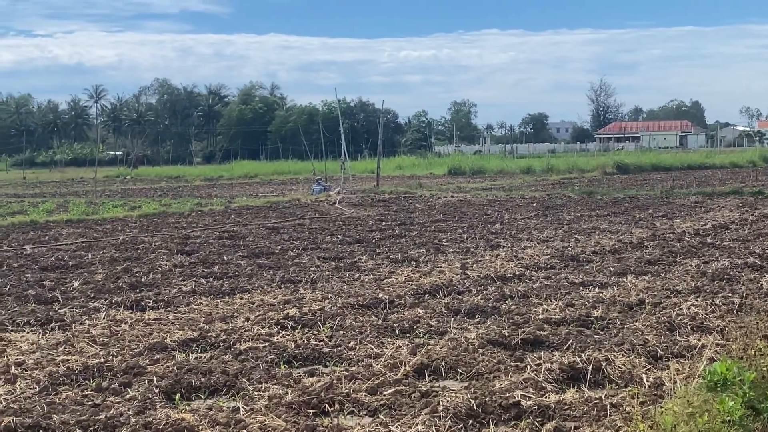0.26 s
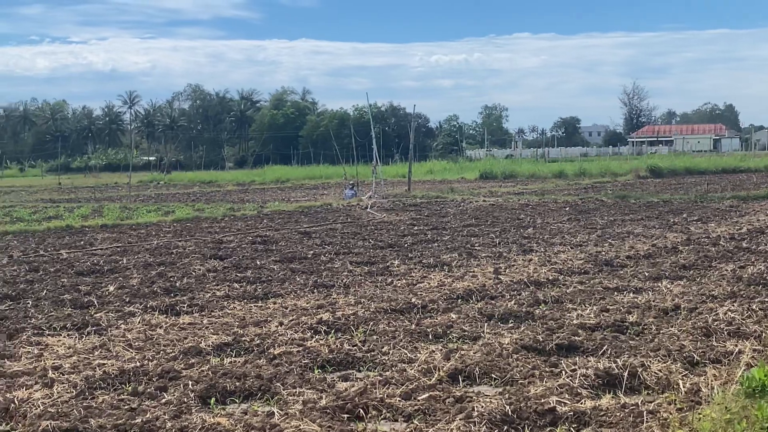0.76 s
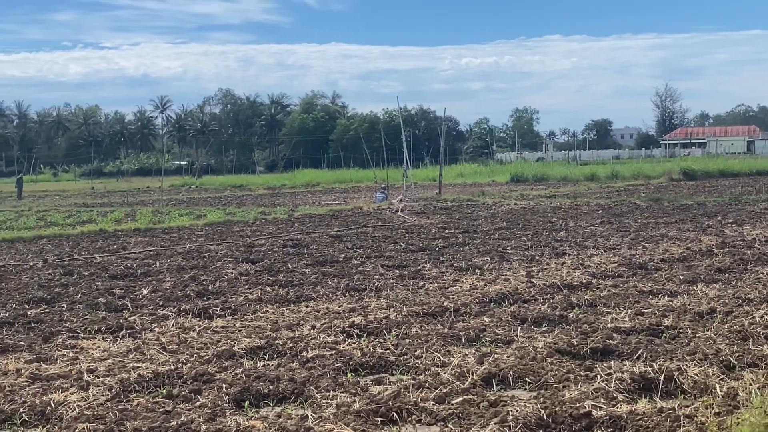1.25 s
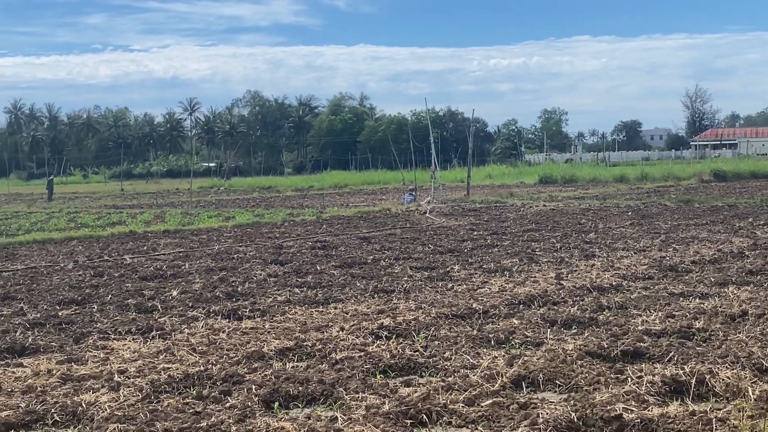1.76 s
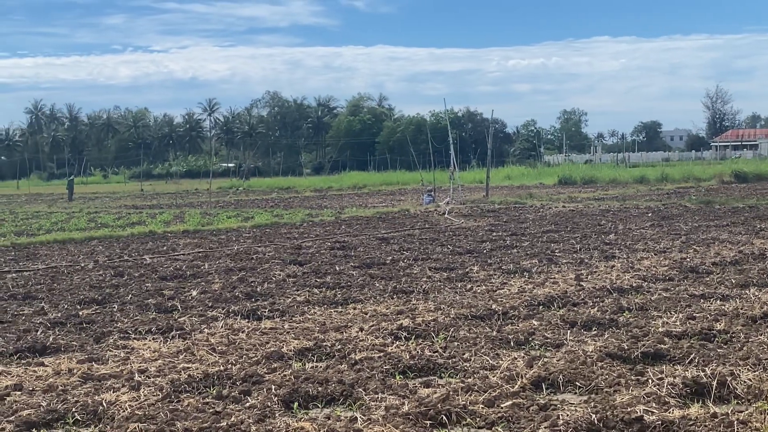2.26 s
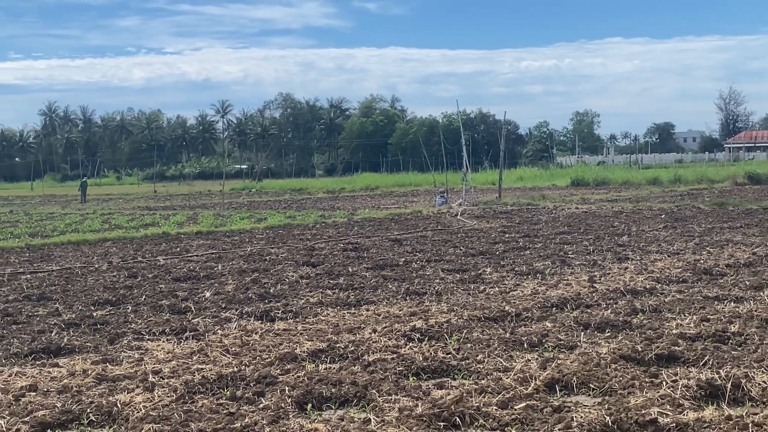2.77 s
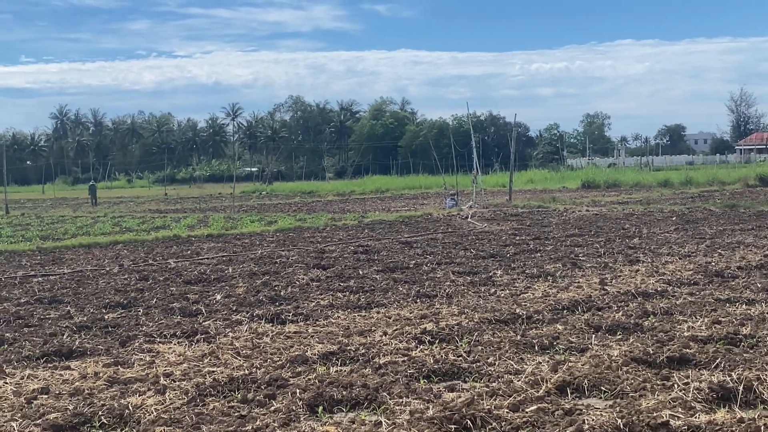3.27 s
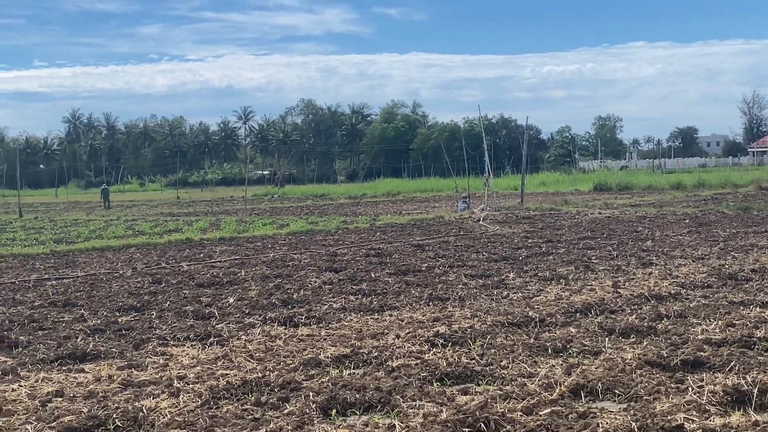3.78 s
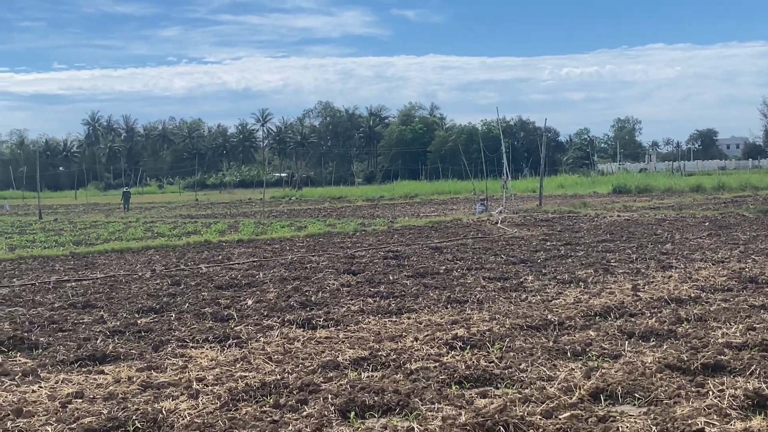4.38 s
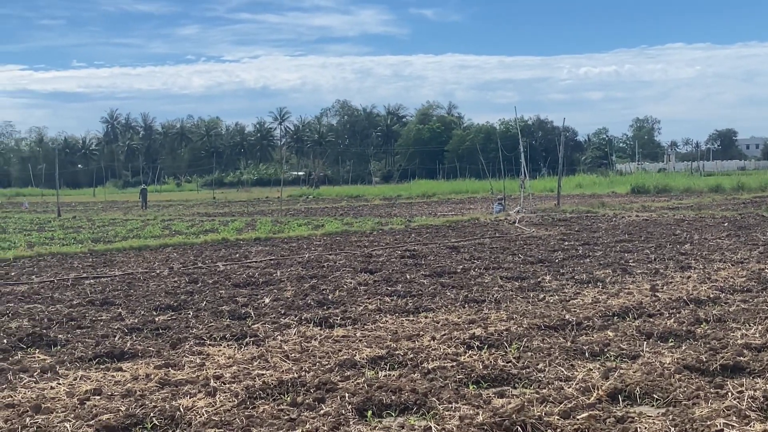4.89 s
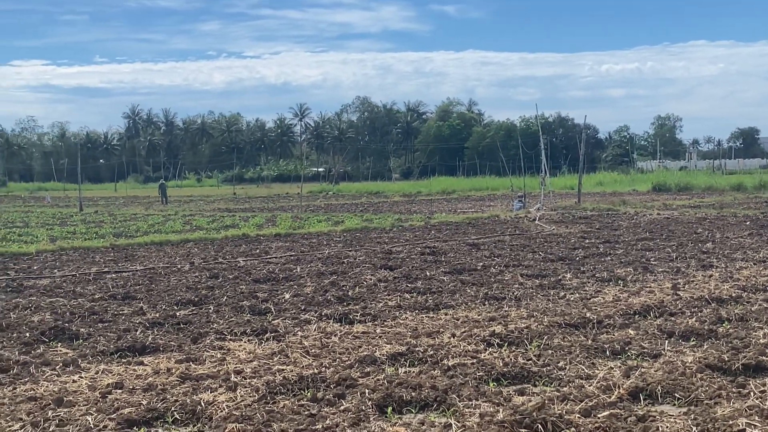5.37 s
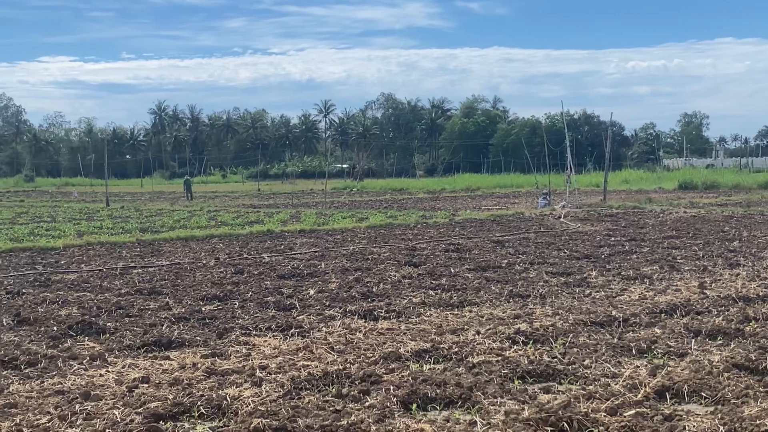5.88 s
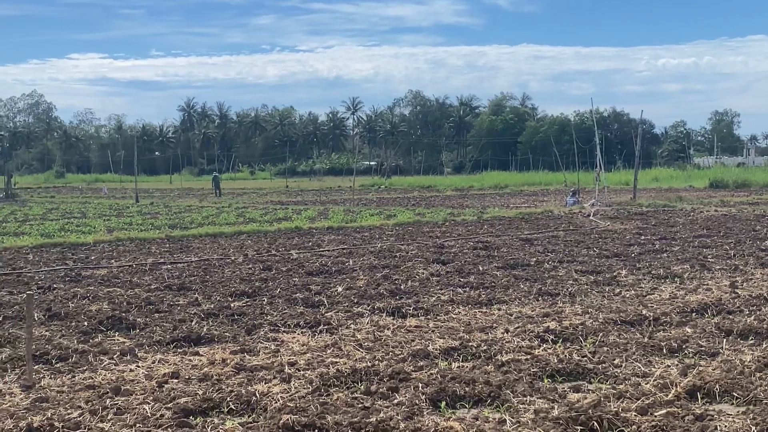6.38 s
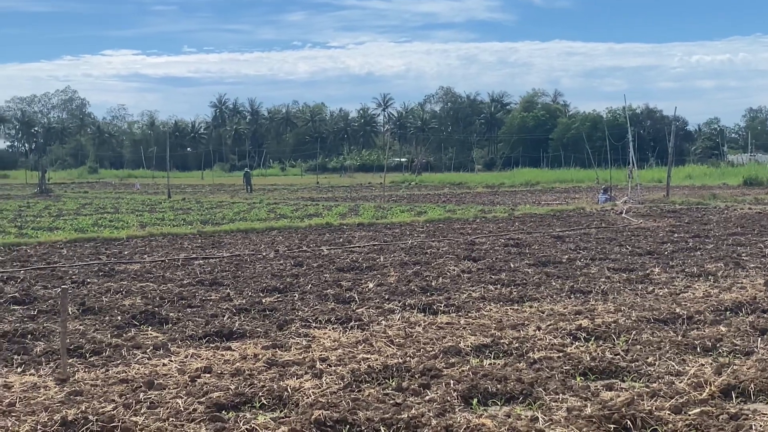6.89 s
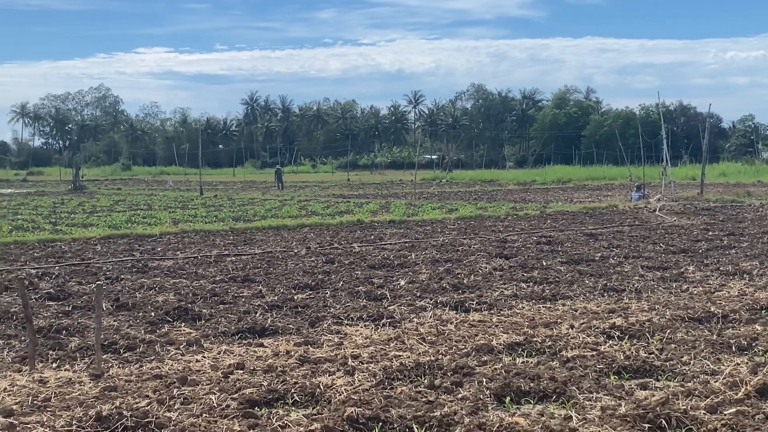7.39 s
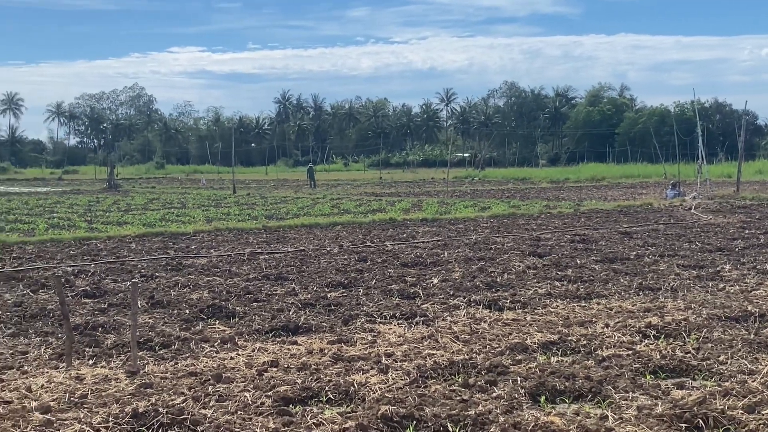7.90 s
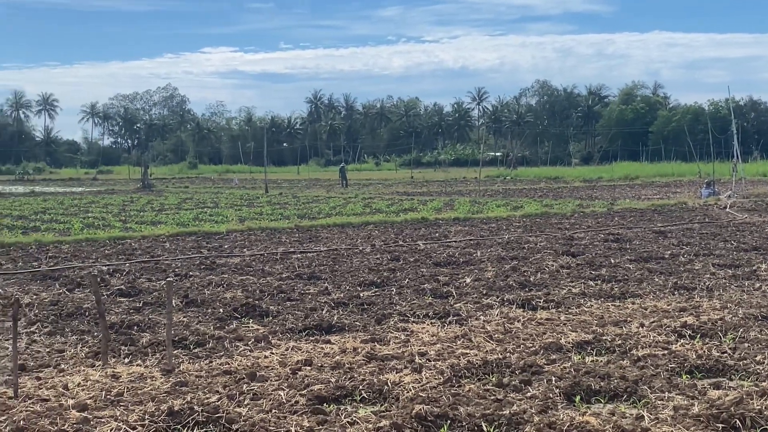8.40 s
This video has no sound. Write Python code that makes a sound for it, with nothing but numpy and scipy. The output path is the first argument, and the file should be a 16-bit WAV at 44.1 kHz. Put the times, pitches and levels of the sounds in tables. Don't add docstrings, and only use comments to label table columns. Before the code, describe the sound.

Low buffeting wind bursts over a soft distant hush, with tiny scattered bird calls, a faint far engine popping and a few finger taps.

```python
import sys
import numpy as np
from scipy import signal
from scipy.fft import rfft, irfft
from scipy.io import wavfile
from scipy.ndimage import uniform_filter1d

SR = 44100
rng = np.random.default_rng(int(sys.argv[2]) if len(sys.argv) > 2 else 0)


def ratio(d):
    e = np.asarray(d, float) / 20
    return 10 ** e


def int16_out(signal):
    q = np.round(np.clip(np.atleast_2d(signal).T, -1, 1) * 32767)
    wavfile.write(sys.argv[1], SR, q.astype(np.int16))


N = 381465


def evened(x):
    return x / np.sqrt(np.mean(x ** 2) + 1e-20)


def curve(points):
    return np.interp(np.arange(N) / SR, *np.transpose(points))


def add(mix, s, sound):
    part = mix[round(max(s, 0) * SR):][:len(sound)]
    part += sound[:len(part)]


def slow(length, hz):
    low_pass = signal.butter(2, hz, fs=SR, output="sos")
    settled = signal.sosfilt(low_pass, rng.standard_normal(length + 4000))[4000:]
    return evened(settled)


def noise(spectrum, size, patchy_db):
    frames, hz = 4 * N // size + 5, np.fft.rfftfreq(size, 1 / SR)
    real, imaginary, patches = rng.standard_normal((frames, len(hz), 3)).T
    patches = uniform_filter1d(patches, size=14, axis=0)
    patches = evened(uniform_filter1d(patches, size=12, axis=1))
    f, db = np.transpose(spectrum)
    colour_db = np.interp(np.log(hz + 1), np.log(f + 1), db)
    z = (real + 1j * imaginary) * ratio(colour_db[:, None] + patchy_db * patches)
    return evened(signal.istft(z, nperseg=size, noverlap=3 * size // 4)[1][:N])


# (time [s], rumble level [dB])
WIND_PUSH = [(0, -55.5), (1, -60), (1.85, -61.5), (2.5, -56.5), (3.25, -57), (3.45, -62), (4.2, -55.5),
             (6.5, -56.5), (6.87, -67.5), (7.11, -53), (7.6, -55), (8, -47), (8.65, -54)]
# (frequency [Hz], density [dB per Hz])
RUMBLE_SPECTRUM = [(15, -46), (30, -16), (50, -0.5), (78, -1), (110, -14.5), (170, -25), (300, -28.5),
                   (900, -91)]
# (frequency [Hz], density [dB per Hz])
FLAP_SPECTRUM = [(60, -11), (130, 8), (300, -15), (420, -21.5), (700, -102)]
# (time [s], peak level [dB], sharpness [dB])
LARGE_EDDIES = [(0.059, -36.5, 0.5), (0.078, -34.5, 0.5), (0.099, -33.5, -9.5), (0.669, -31.5, -6.5),
                (0.741, -36.5, -8.5), (0.77, -33.5, -17.5), (1.296, -36.5, -6), (2.642, -38, -10.5),
                (2.932, -33.5, -9), (3.062, -36, -9.5), (3.106, -28, -10), (3.13, -26, -13),
                (3.155, -19.5, -12), (3.256, -27.5, -15), (3.972, -33.5, -2.5), (5.157, -33.5, -10.5),
                (5.552, -36, -12), (5.601, -37, -8), (6.172, -40, -2), (6.372, -38.5, -9),
                (6.422, -41.5, -3.5), (7.665, -39, -9.5), (7.767, -31, -16), (7.809, -41, -17),
                (7.902, -33.5, -18), (7.953, -26.5, -16), (8.022, -31, -18), (8.088, -36.5, -17.5),
                (8.361, -23, -16.5), (8.433, -36, -24)]
# (time [s], peak level [dB])
SMALL_EDDIES = [(.19, -52), (0.377, -41.5), (0.501, -59), (.875, -55), (.945, -55), (1.01, -51),
                (1.221, -56), (1.91, -50), (2.439, -45.5), (2.585, -51), (2.735, -50.5), (2.917, -37.5),
                (3.035, -39), (3.184, -40), (3.292, -37), (8.39, -35), (0.805, -46), (1.368, -46),
                (1.573, -45), (2.227, -44.5), (2.268, -41), (2.318, -45), (2.962, -40), (3.219, -38.5),
                (3.333, -48), (3.362, -46), (4.153, -41.5), (4.421, -44), (4.474, -45), (4.634, -40.5),
                (4.692, -43), (5.449, -45), (5.853, -38.5), (5.911, -42), (6.067, -42), (6.271, -46.5),
                (7.214, -44.5), (7.311, -39.5), (7.472, -47), (7.702, -42.5), (7.871, -53), (8.211, -61),
                (8.272, -49.5), (8.309, -41), (8.622, -40.5)]
SMALL_SHARP_DB = -12.5
RING_HZ, RING_HZ_PER_DB = 87.2, 1.9


def wind():
    lumps = ratio(curve(WIND_PUSH) + 1.0 + 1.8 * slow(N, 7.0))
    mid = lumps * noise(RUMBLE_SPECTRUM, size=4096, patchy_db=1.5)
    side = lumps * noise(RUMBLE_SPECTRUM, size=4096, patchy_db=1.5)
    eddies = LARGE_EDDIES + [(s, db, SMALL_SHARP_DB) for s, db in SMALL_EDDIES]
    flaps, t = np.zeros(N), np.arange(6000) / SR
    lean = rng.standard_normal(len(eddies))
    rise = t / 0.0065
    for (s, db, sharp_db), pan in zip(eddies, lean):
        fall_hz = 420 * ratio(1.264 * sharp_db) * np.exp(-t / 0.00782)
        hz = RING_HZ + RING_HZ_PER_DB * sharp_db + fall_hz
        thump = ratio(db) * 1.66 * rise ** 2 * np.exp(2j * np.pi * np.cumsum(hz) / SR - rise)
        add(mid, s - .015, thump.imag)
        add(side, s - .015, 1.05 * pan * thump.real)
        flap = signal.windows.hann(round(0.047 * SR))
        add(flaps, s - .032, ratio(db + 1.25 * sharp_db - 3.5) * flap)
    mid += flaps * noise(FLAP_SPECTRUM, size=1024, patchy_db=2.0)
    side += 1.5 * flaps * noise(FLAP_SPECTRUM, size=1024, patchy_db=-1.5)
    return np.array([mid + ratio(-14.5) * side, mid - ratio(-17.0) * side])


def singer(notes, overtone_db, rough, edge):
    out = np.zeros(N, complex)
    for s, length, first, middle, last, db in notes:
        u = np.linspace(0, 1, round(length * SR))
        hz = first * 2 * (u - .5) * (u - 1) - middle * 4 * u * (u - 1) + last * 2 * u * (u - .5)
        turn = np.exp(2j * np.pi * np.cumsum(hz) / SR)
        tone = turn + ratio(overtone_db) * turn ** 2
        add(out, s, ratio(db) * tone * signal.windows.tukey(len(u), np.clip(edge, 0, 1)))
    scatter = slow(N, 150.0) + 1j * slow(N, 150.0)
    return (out * (np.sqrt(2 - 2 * rough ** 2) + rough * scatter)).real


def glides(rows, early):
    return [(s, length, first, first + early * (last - first), last, db)
            for s, length, first, last, db in rows]


def hook(s, hz, db):
    return s - .002, .029, .94 * hz, 1.01 * hz, 0.838 * hz, db


# (time [s], top frequency [Hz], level [dB])
PAIRED_HOOKS = [(1.042, 3012, -62.5), (1.201, 2940, -64), (1.35, 3154, -63), (1.551, 2720, -64.5),
                (1.795, 2840, -64), (2.018, 2850, -67), (2.276, 2910, -69), (2.54, 2730, -69),
                (2.816, 2750, -68), (3.097, 2910, -67), (3.375, 2850, -66), (3.655, 2790, -66),
                (3.942, 2810, -65), (4.222, 2860, -65), (4.44, 3055, -66.5), (4.709, 2770, -66.5),
                (4.984, 2890, -67), (5.225, 2890, -68.5), (5.572, 2850, -65), (5.921, 2850, -69)]
HOOK_GAP_S = .043


def hooks():
    paired = PAIRED_HOOKS + [(s + HOOK_GAP_S, hz, db) for s, hz, db in PAIRED_HOOKS]
    return singer([hook(*row) for row in paired], overtone_db=-17, rough=.25, edge=.3)


# (time [s], length [s], first frequency [Hz], last frequency [Hz], level [dB])
UPSTROKES = [(0.145, 0.036, 4250, 5550, -62.5), (6.862, .025, 6500, 7300, -84),
             (6.755, .025, 4950, 5550, -77), (.155, .06, 4750, 5200, -71), (0.195, 0.03, 5080, 5650, -65.5),
             (5.752, .025, 5100, 5700, -75), (7.29, .018, 5800, 6600, -75.5),
             (7.535, .02, 5700, 6500, -79.5), (2.875, .045, 5250, 5550, -83), (1.96, .04, 4100, 5100, -80),
             (2.39, .065, 3750, 4200, -70), (0.325, 0.03, 4200, 6510, -66.5),
             (.33, 0.028, 4700, 5660, -64.5), (.312, 0.021, 3600, 3910, -66),
             (1.532, 0.031, 4190, 5930, -73.5), (1.995, 0.025, 6500, 7300, -85.5),
             (2.445, 0.025, 4230, 5800, -79), (2.839, 0.05, 4280, 5230, -79.5),
             (3.376, 0.03, 3630, 5700, -60.5), (3.964, 0.026, 4260, 5900, -67),
             (4.169, 0.02, 3580, 5700, -65), (4.578, 0.048, 3200, 6900, -76),
             (7.118, 0.07, 4600, 7020, -69.5), (8.605, 0.041, 4600, 5830, -77)]
# (time [s], length [s], first frequency [Hz], last frequency [Hz], level [dB])
DOWNSTROKES = [(0.388, 0.04, 6240, 2044, -62), (.4, .032, 5720, 3400, -66.5),
               (2.345, .045, 4120, 3700, -70.5), (0.992, 0.024, 5900, 4280, -70.5),
               (3.07, 0.043, 3990, 3440, -69.5), (3.319, 0.069, 5290, 3790, -71.5),
               (3.473, 0.038, 6540, 3410, -64), (4.028, 0.019, 6270, 3740, -70),
               (4.135, 0.046, 5000, 3510, -66.5), (4.6, 0.064, 2895, 2330, -74),
               (4.645, 0.016, 6600, 4500, -77), (6.775, 0.021, 5320, 4870, -73.5)]
# (time [s], length [s], top frequency [Hz], level [dB])
CRESTED = [
    (0.345, 0.061, 3930, -69.5),
    (0.355, .04, 6840, -77),
    (3.121, 0.078, 3340, -70.5),
    (3.44, 0.027, 6530, -66.5),
    (3.996, 0.039, 6780, -81),
    (4.194, 0.068, 6530, -77.5),
    (6.77, 0.053, 6500, -78),
]


def sweeps():
    crests = [(s, length, .92 * hz, hz, .92 * hz, db) for s, length, hz, db in CRESTED]
    notes = glides(UPSTROKES, early=0.54) + glides(DOWNSTROKES, early=0.53) + crests
    return singer(notes, overtone_db=-34, rough=.68, edge=.25)


# (time [s], length [s], frequency [Hz], level [dB])
SHORT_CHIPS = [(0.965, 0.0099, 4300, -66.5), (1.003, 0.013, 4620, -74.5), (.452, .014, 3500, -68),
               (.672, .014, 5000, -73), (.51, .016, 6500, -78.5), (7.495, .022, 3600, -71),
               (8.14, 0.024, 3750, -75), (3.4, 0.053, 5480, -58.5), (3.499, 0.012, 2800, -65),
               (3.724, 0.018, 3600, -68), (4.1, 0.018, 3220, -63), (4.044, .012, 3780, -59.5),
               (6.67, .014, 4250, -76), (6.71, .02, 3600, -74), (6.891, 0.026, 3660, -68),
               (7.088, 0.018, 3750, -62), (7.288, 0.014, 3500, -66.5)]


def chips():
    notes = [(s, length, hz, hz, hz, db) for s, length, hz, db in SHORT_CHIPS]
    return singer(notes, overtone_db=-40, rough=.7, edge=.4)


# (time [s], level [dB])
CLIMB_TIMES = [
    (0.43, -73),
    (0.701, -78),
    (1.0, -75),
    (1.306, -81.5),
    (1.615, -80),
    (1.92, -85),
]
# (delay [s], length [s], first frequency [Hz], last frequency [Hz], level [dB])
STEPS = [
    (0, .066, 4640, 5160, 1.5),
    (0.065, .045, 5360, 6770, -1.5),
    (0.098, 0.023, 6700, 6800, -7),
]


def climbs():
    rows = [(s + late, length, first, last, db + step_db)
            for s, db in CLIMB_TIMES for late, length, first, last, step_db in STEPS]
    return singer(glides(rows, early=.6), overtone_db=-40, rough=.35, edge=.3)


# (time [s], length [s], first frequency [Hz], last frequency [Hz], level [dB])
THIN_WHISTLES = [(0.565, 0.12, 1390, 1520, -68.5), (.69, .1, 1600, 1810, -73), (.7, .15, 1420, 1448, -74),
                 (1.395, .055, 1440, 1410, -71.5), (1.033, 0.074, 777, 810, -69),
                 (1.228, 0.083, 980, 927, -67.5), (1.86, 0.12, 1430, 1640, -67.5),
                 (1.98, .095, 1700, 2050, -67), (2.04, 0.13, 1200, 1496, -70.5),
                 (2.2, 0.098, 1960, 1800, -69), (2.65, 0.08, 1780, 1755, -72),
                 (2.906, 0.086, 1017, 854, -67.5), (4.013, 0.022, 3070, 3470, -64),
                 (5.02, 0.12, 832, 713, -71), (5.157, 0.069, 1550, 1450, -69),
                 (5.27, 0.048, 2386, 2400, -71), (8.401, 0.11, 843, 757, -69.5)]


def whistles():
    return singer(glides(THIN_WHISTLES, early=.5), overtone_db=-30, rough=.6, edge=.2)


# (time [s], length [s], first frequency [Hz], last frequency [Hz], level [dB])
FALLING = [
    (5.87, .075, 3250, 2820, -70),
    (6.24, .135, 3350, 2600, -68),
    (7.755, .125, 2850, 2560, -72),
    (8.03, .115, 2800, 2520, -72),
    (8.34, .09, 2680, 2490, -72),
    (8.58, .068, 2900, 2500, -75),
]
# (time [s], length [s], top frequency [Hz], level [dB])
DROOPING = [
    (4.616, 0.048, 7200, -93),
    (7.405, 0.066, 6000, -76),
    (7.657, 0.051, 5860, -78.5),
    (8.154, 0.052, 5780, -75.5),
]
# (time [s], top frequency [Hz], level [dB])
SINGLE_HOOKS = [
    (1.377, 3570, -68),
    (1.573, 3300, -67.5),
    (1.821, 3310, -69.5),
    (2.455, 2800, -78),
]


def clear_notes():
    arches = [(s, length, 0.9 * hz, hz, .92 * hz, db) for s, length, hz, db in DROOPING]
    notes = glides(FALLING, early=.74) + arches + [hook(*row) for row in SINGLE_HOOKS]
    return singer(notes, overtone_db=-30, rough=.2, edge=.25)


# (time [s], length [s], first frequency [Hz], last frequency [Hz], level [dB])
THIN_THREADS = [(2.13, 0.059, 1760, 1634, -63.5), (2.15, 0.12, 2290, 2130, -73),
                (2.62, 0.097, 1970, 2020, -69), (3.46, .39, 2443, 2440, -75.5),
                (3.74, 0.1, 3270, 3180, -71.5), (4.03, .05, 2520, 2380, -69.5),
                (4.075, .065, 2380, 2330, -67.5), (4.22, 0.17, 2430, 2380, -75.5),
                (4.22, 0.078, 3820, 3770, -72.5), (4.31, 0.073, 3870, 3840, -72.5),
                (4.22, 0.07, 4590, 4500, -75.5), (4.7, 0.054, 3260, 3360, -76),
                (1.62, 0.077, 2000, 2070, -74.5), (4.41, 0.022, 2790, 2570, -66),
                (4.68, .04, 2360, 2310, -73), (4.86, 0.055, 4170, 4120, -76), (6.85, .04, 5050, 5000, -79),
                (6.82, .08, 5850, 5800, -83), (5.39, .06, 4650, 4720, -77), (7.2, .07, 5750, 5700, -82),
                (3.86, .17, 1450, 1430, -74), (5.18, .03, 3340, 3440, -72),
                (5.35, 0.046, 2860, 2740, -71.5), (5.38, 0.045, 2373, 2290, -70.5),
                (5.45, 0.097, 2440, 2290, -71), (6.87, .18, 1427, 1477, -74), (5.95, .04, 2630, 2530, -71),
                (7.92, 0.067, 5800, 5720, -82), (8.095, 0.074, 2790, 2850, -72.5),
                (8.385, 0.023, 2820, 2790, -77), (8.43, 0.11, 4020, 4130, -80)]


def threads():
    return singer(glides(THIN_THREADS, early=.5), overtone_db=-40, rough=.35, edge=.4)


def buzzer(buzzes, per_s, jitter, width_hz, sag_hz):
    out, t = np.zeros(N), np.arange(800) / SR
    for s, length, hz, db in buzzes:
        turns = np.cumsum(per_s * np.exp(jitter * slow(round(length * SR), 200.0))) / SR
        clicks = np.diff(np.floor(turns), prepend=0) * signal.windows.tukey(len(turns), .25)
        resonance = t * np.exp(2 * np.pi * (1j * hz - width_hz) * t)
        rings = signal.fftconvolve(clicks, resonance)
        sag = sag_hz * np.exp(-np.arange(len(rings)) / SR / (.3 * length))
        bend = np.exp(2j * np.pi * np.cumsum(sag) / SR)
        add(out, s, ratio(db) * evened((rings * bend).imag))
    return out


# (time [s], length [s], frequency [Hz], level [dB])
LOW_CALLS = [
    (6.53, .11, 2500, -73),
    (6.72, .11, 2540, -72),
    (6.91, .12, 2500, -69),
    (7.112, .105, 2530, -67),
    (7.295, .115, 2500, -68),
    (7.485, .14, 2500, -68.5),
    (7.68, .21, 1820, -71),
    (7.95, .07, 1980, -74),
    (8.04, .22, 1770, -70),
    (8.35, .13, 1820, -73),
]


def low_buzzes():
    return buzzer(LOW_CALLS, per_s=150, jitter=.2, width_hz=160, sag_hz=260)


# (time [s], length [s], frequency [Hz], level [dB])
HIGH_CALLS = [(2.3, 0.04, 4970, -80), (2.34, .08, 5500, -80), (2.55, .03, 5700, -87),
              (5.13, .07, 5570, -85), (8.33, .05, 4730, -79), (8.385, .06, 5430, -78.5),
              (8.47, .07, 4800, -80), (3.1, 0.074, 5650, -74), (3.37, 0.06, 7830, -83.5),
              (3.72, 0.11, 5370, -75), (4.12, .04, 5360, -75.5), (4.22, .06, 4500, -76),
              (4.72, .09, 5170, -81), (5.36, 0.043, 5060, -78), (5.56, .08, 5300, -81),
              (5.755, 0.1, 5520, -78), (6.045, 0.05, 6100, -81.5), (7.295, 0.03, 6570, -73),
              (7.545, 0.036, 6600, -78.5), (7.79, .05, 6470, -81), (8.04, 0.017, 6670, -78.5),
              (8.28, 0.037, 6200, -79), (8.53, 0.061, 6250, -84)]


def high_buzzes():
    return buzzer(HIGH_CALLS, per_s=630, jitter=0.9, width_hz=260, sag_hz=-300)


# (time [s], length [s], first frequency [Hz], last frequency [Hz], level [dB])
INSECT_TONES = [
    (0, .47, 2550, 2540, -71),
    (.5, .08, 2545, 2540, -73),
    (.62, .33, 2545, 2540, -76.5),
]


def insect():
    return singer(glides(INSECT_TONES, early=.5), overtone_db=-40, rough=.92, edge=.15)


# (time [s], level [dB])
FLOCK_LEVEL = [(0, 1.5), (1.5, 0.5), (2.2, -2), (3, -2), (4.3, 2), (5.5, 1), (6.8, -1), (7.8, -4),
               (8.65, -8)]


def flock(count):
    when, length, hz, bend, level = rng.random((count, 5)).T
    s = when * N / SR
    hz = 1900 * np.exp(1.15 * hz)
    fall_db = 9 * np.log2(hz / 1900)
    db = -69.5 - 6 * level - fall_db + np.interp(s, *np.transpose(FLOCK_LEVEL))
    first, last = hz * (1.1 - 0.18 * bend), hz * (0.83 + .15 * bend)
    notes = np.transpose([s, .012 + 0.05 * length, first, hz, last, db])
    return singer(notes, overtone_db=-40, rough=.45, edge=.6)


def far(x, wet_db, t60):
    t = np.arange(round(.3 * SR)) / SR
    tail = rng.standard_normal((len(t), 2)).T * ratio(-60 * t / t60) * (t > .004)
    tail = tail[:1] + 0.26 * tail
    tail = tail / np.linalg.norm(tail[0])
    return x + ratio(wet_db) * signal.fftconvolve(x, tail, axes=1)[:, :N]


def calls_afield():
    # (voice, lean to the left [dB])
    voices = [(hooks(), .8), (flock(count=420), 0), (climbs(), -.6), (sweeps(), .6), (insect(), 0),
              (chips(), .6), (whistles(), -.8), (clear_notes(), .9), (threads(), -.3),
              (low_buzzes(), .4), (high_buzzes(), -.4)]
    pair = sum(voice * ratio(np.array([[pan_db], [-pan_db]])) for voice, pan_db in voices)
    return far(pair, wet_db=-7.5, t60=.18)


# (time [s], peak level [dB], frequency [Hz], snap share)
FINGER_TAPS = [
    (7.601, -56, 1500, .4),
    (7.626, -56, 1250, .05),
    (7.638, -45, 1075, .05),
    (7.651, -50, 830, 0.46),
    (7.656, -48, 530, 0.67),
    (7.674, -49, 900, .1),
    (7.699, -54, 885, .05),
    (7.714, -48, 896, 0.36),
    (7.72, -46, 504, .1),
    (8.303, -53, 1150, .5),
]
# (time [s], peak level [dB])
DRY_TICKS = [
    (7.4073, -58.5),
    (7.4594, -78),
]


def handling():
    taps, ticks, t = np.zeros(N), np.zeros(N), np.arange(1500) / SR
    for s, db, hz, snap in FINGER_TAPS:
        ring = np.sin(2 * np.pi * hz * t) + snap * np.sin(2 * np.pi * 1600 * t)
        add(taps, s, ratio(db - 60 * t / 0.029) * ring * (1 - np.exp(-t / 0.00077)))
    for s, db in DRY_TICKS:
        add(ticks, s, ratio(db - 60 * t / 0.0028) * np.sin(2 * np.pi * 7500 * t))
    return taps * np.array([[1.5], [.4]]) + ticks * np.array([[1.2], [.8]])


# (time [s], firings so far)
ENGINE_TURNS = [(0, .35), (.72, 9), (1.44, 17.73), (2.16, 26.55), (2.88, 35.68), (3.6, 44.95),
                (4.32, 54.23), (5.04, 63.54), (5.76, 72.78), (6.48, 82), (7.2, 91.19), (7.92, 100.13),
                (8.65, 108.7)]
# (time [s], peak level [dB])
ENGINE_LEVEL = [(0, -70), (1, -63), (2.2, -62.5), (4, -59), (6, -58), (7.4, -59.5), (8.65, -60)]
POP_FIRST_HZ, POP_LAST_HZ, POP_S = 850, 380, .0034


def pump():
    fired = np.flatnonzero(np.diff(np.floor(curve(ENGINE_TURNS))))
    level_db, t, out = curve(ENGINE_LEVEL), np.arange(1200) / SR, np.zeros(N)
    shape = t / POP_S * np.exp(1 - t / POP_S)
    fall_hz = POP_LAST_HZ + (POP_FIRST_HZ - POP_LAST_HZ) * np.exp(-t / .004)
    for at, (size, pitch, late) in zip(fired, rng.standard_normal((len(fired), 3))):
        hz = fall_hz * np.exp(.08 * pitch)
        knock = shape * np.sin(2 * np.pi * np.cumsum(hz) / SR)
        add(out, at / SR + .003 * late, ratio(level_db[at] - 1.0 + 3.0 * size) * knock)
    return out


# (frequency [Hz], density [dB per Hz])
HUSH_MID = [(60, -30), (100, -7), (155, -6.5), (516, -8), (600, -11.5), (1330, -16.5), (1480, -14.5),
            (2660, -18), (3190, -24), (4940, -30), (6200, -43), (8100, -45.5), (8250, -87.5)]
# (frequency [Hz], density [dB per Hz])
HUSH_WIDE = [(60, -40.5), (100, -4), (210, -5.5), (410, -3.5), (600, -6.5), (1310, -1.5), (1800, -17.5),
             (2100, -39), (4000, -46), (5000, -31), (6500, -48)]
# (time [s], level [dB])
UNLEARNED = [(0, -67), (.2, -63.5), (.35, -68.5), (.5, -80.5), (.7, -85), (1.0, -110)]
# (frequency [Hz], density [dB per Hz])
UNLEARNED_SPECTRUM = [(1500, 1.5), (3000, 1.5), (6000, 3.5), (8100, -8), (8250, -56), (8850, -50),
                      (9000, -17), (12300, -25), (12600, -56)]
# (frequency [Hz], density [dB per Hz])
HALO_SPECTRUM = [(2000, -25.5), (2800, 1.5), (5500, -6), (7000, -27), (8100, -36), (8300, -53)]
# (frequency [Hz], density [dB per Hz])
AIR_MID = [(8850, -32.5), (9000, -1), (12300, 3), (12500, -41)]
# (frequency [Hz], density [dB per Hz])
AIR_WIDE = [(8000, -41.5), (8200, 3.5), (10200, -2.5), (10400, -45), (11700, -39.5), (11900, -1.5),
            (13000, -10), (13200, -38)]
HUSH_DB, HUSH_SIDE_DB, AIR_DB = -63.5, -71.5, -100


def hush(calls):
    settle_db = curve(UNLEARNED)
    opening = uniform_filter1d(evened(calls[0]) ** 2, size=4000) ** .33 * ratio(curve(FLOCK_LEVEL))
    mid = ratio(HUSH_DB) * noise(HUSH_MID, size=1024, patchy_db=2.0)
    mid += ratio(settle_db) * noise(UNLEARNED_SPECTRUM, size=1024, patchy_db=1.0)
    mid += ratio(-76.5) * opening * noise(HALO_SPECTRUM, size=512, patchy_db=3.5)
    mid += ratio(AIR_DB) * noise(AIR_MID, size=1024, patchy_db=-1.0)
    side = ratio(HUSH_SIDE_DB) * noise(HUSH_WIDE, size=1024, patchy_db=2.0)
    halo_gain = ratio(-85.5) * opening + ratio(settle_db - 6.5)
    side += halo_gain * noise(HALO_SPECTRUM, size=1024, patchy_db=4.0)
    air_gain = ratio(AIR_DB + 1.0) + ratio(settle_db - 22.5)
    side += air_gain * noise(AIR_WIDE, size=1024, patchy_db=1.5)
    return np.array([mid + side, mid - side])


def scene():
    calls = calls_afield()
    return wind() + calls + handling() + pump() + hush(calls)


# (frequency [Hz], phase [rad])
PHASE_LEAD = [(0, 0.13), (690, -0.25), (950, -0.8), (1550, 0.94), (1890, 0.35), (2930, -0.29),
              (6030, -0.57), (7490, 0.01)]
# (frequency [Hz], level [dB])
LEVEL_BALANCE = [(60, -1), (160, 0), (410, -1), (1070, 0.5), (2810, 0), (7340, -0.5)]


def ports(pair):
    log_hz = np.log(np.fft.rfftfreq(N, 1 / SR) + 1)

    def at_each_hz(points):
        f, value = np.transpose(points)
        return np.interp(log_hz, np.log(f + 1), value)

    lead = ratio(at_each_hz(LEVEL_BALANCE) / 2) * np.exp(.5j * at_each_hz(PHASE_LEAD))
    return irfft(rfft(pair, axis=1) * np.array([lead, 1 / lead]), N, axis=1)


def roll_off(x):
    return signal.sosfilt(signal.butter(12, 13200, fs=SR, output="sos"), x)


def record(dry):
    left, right = ports(dry)
    mid, side = (left + right) / 2, (left - right) / 2
    hz = np.fft.rfftfreq(N, 1 / SR)
    passed = ((hz < 8200) | (hz > 8900)) * (hz < 12400)
    mid = irfft(rfft(mid) * passed, N)
    return roll_off(np.array([mid + side, mid - side]))


dry = scene()
out = record(dry)
int16_out(out)
```